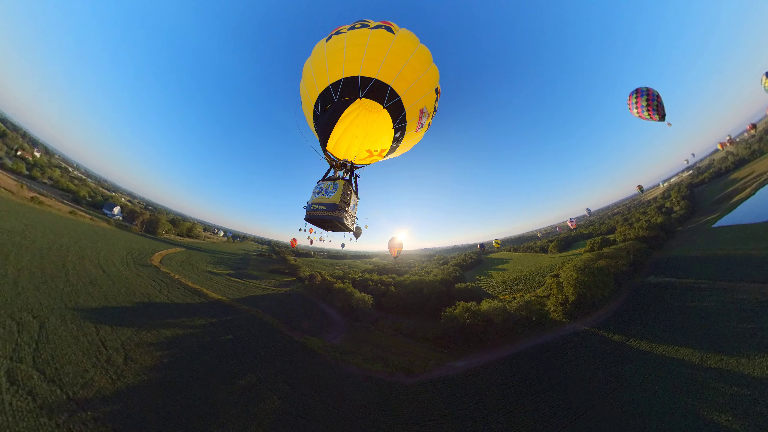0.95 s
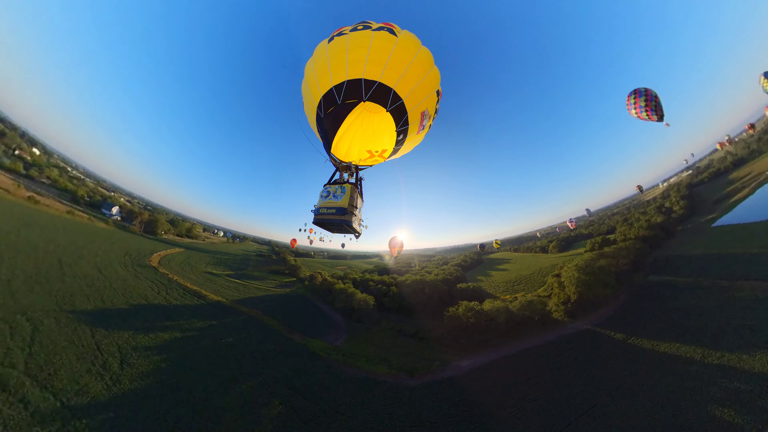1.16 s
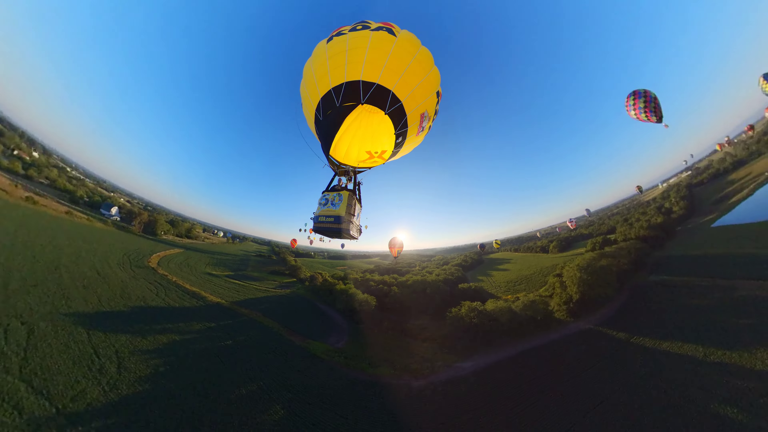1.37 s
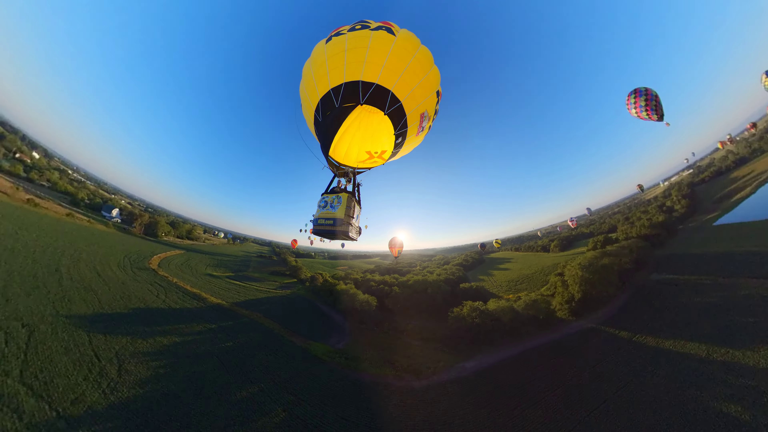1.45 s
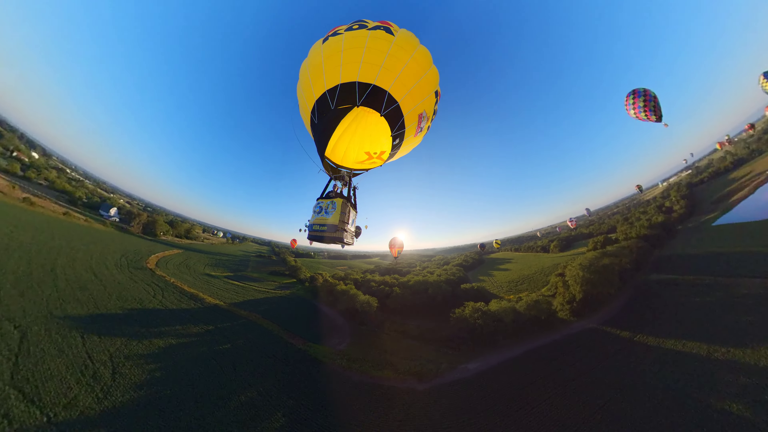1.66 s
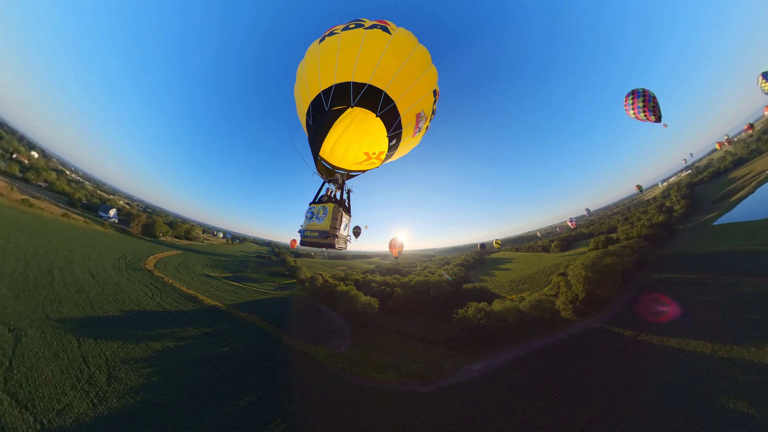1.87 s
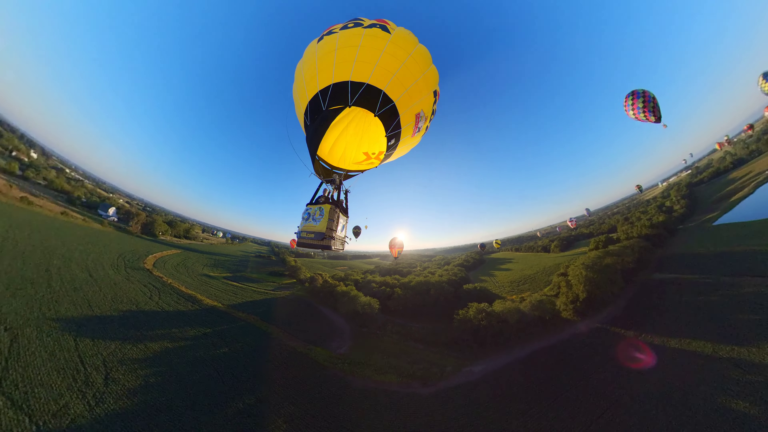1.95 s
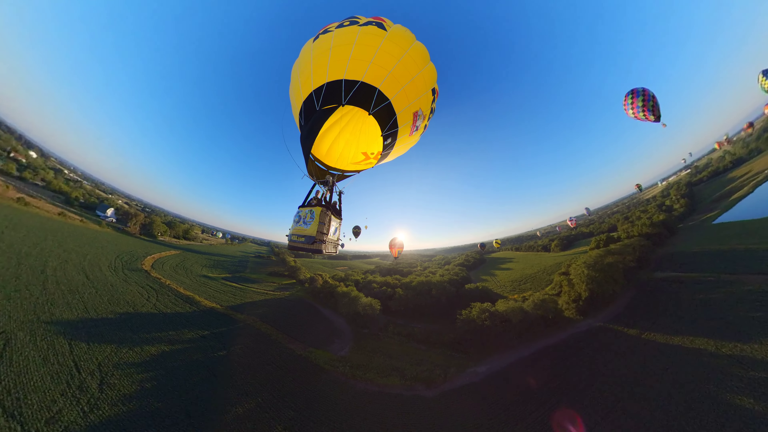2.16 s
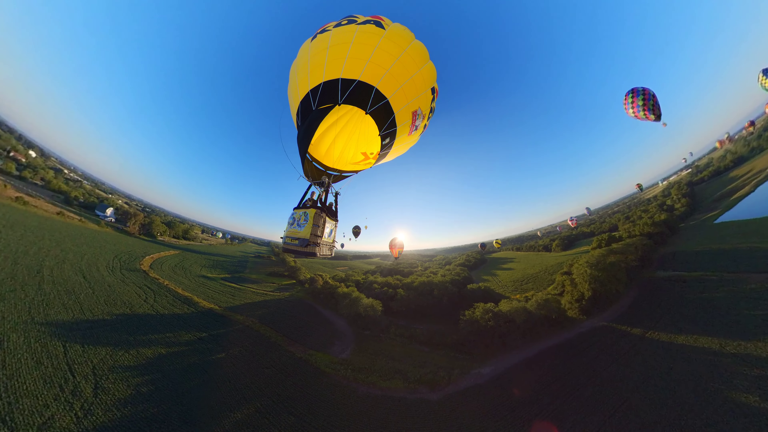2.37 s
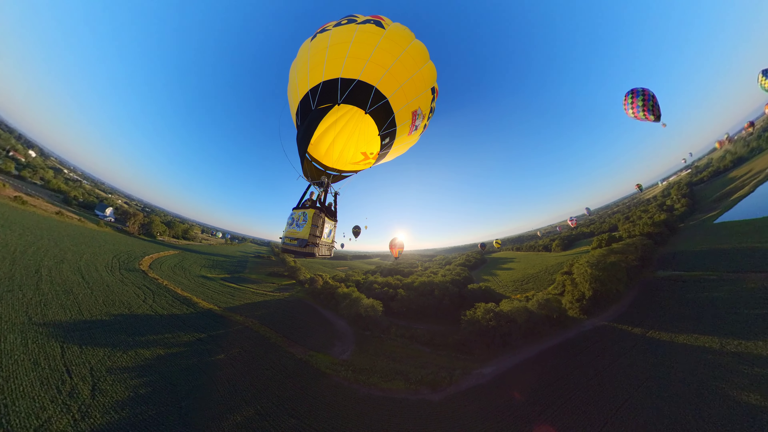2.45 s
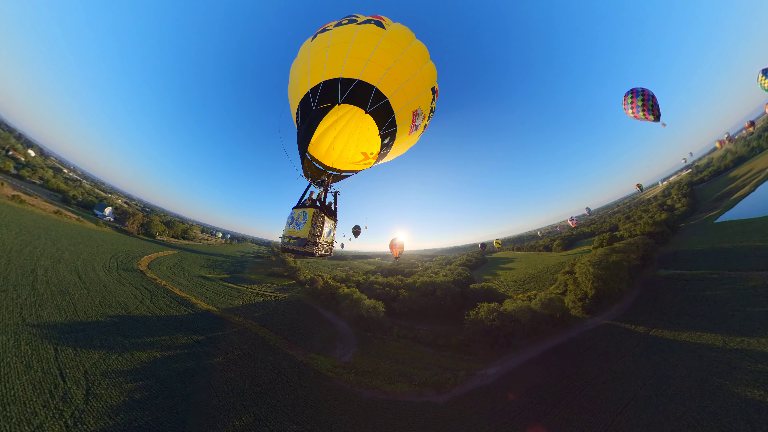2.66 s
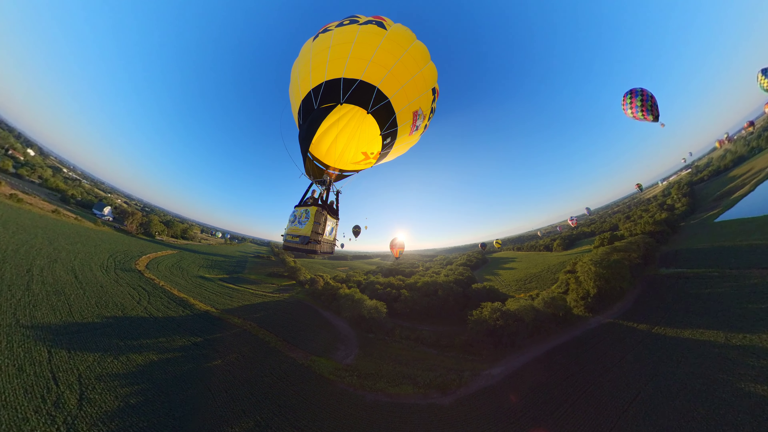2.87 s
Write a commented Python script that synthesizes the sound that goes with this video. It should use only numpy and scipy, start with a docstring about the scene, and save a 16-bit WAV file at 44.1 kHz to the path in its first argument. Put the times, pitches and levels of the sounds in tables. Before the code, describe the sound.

A hot-air balloon gas burner lights with a low whump and roars steadily outdoors

```python
"""A gas burner under a balloon in open air, with a small pilot flame rumbling throughout.
Far birds whistle faintly as a low buffet dies away; the valve clicks with short spits of gas, and the gas
lights with a low whump of sagging pressure swings. The flame, noise with uneven low puffs, then roars and
booms over the patchy hiss of the jets until the valve shuts. Wavering bird tones return at the end.
"""
import sys
import numpy as np
from scipy import signal
from scipy.fft import rfft, irfft
from scipy.io import wavfile
from scipy.ndimage import uniform_filter1d

SR = 44100
rng = np.random.default_rng(int(sys.argv[2]) if len(sys.argv) > 2 else 0)


def store_pcm(level_fs):
    """Save levels as 16-bit WAV."""
    pcm = np.round(np.clip(level_fs, -1, 1) * 32767).astype(np.int16)
    wavfile.write(sys.argv[1], SR, np.atleast_2d(pcm).T)


N = 127890  # length in samples

# Far bird whistles, one curve per call: time_s, pitch_hz, level_db (before the throb)
BIRD_CALLS = [
    [(0, 5650, -76), (.04, 5720, -75), (.07, 5830, -73), (.09, 5880, -70), (.115, 5800, -74),
     (.135, 5650, -84)],
    [(.09, 5700, -86), (.115, 5620, -73), (.14, 5560, -69), (.18, 5400, -72), (.215, 5290, -80)],
    [(0, 4500, -79), (.05, 4550, -78), (.085, 4500, -76), (.11, 4400, -84), (.14, 4500, -82)],
    [(.07, 3800, -88), (.1, 3850, -79), (.14, 3850, -83), (.185, 3900, -76), (.215, 3880, -78)],
    [(.06, 3600, -86), (.08, 3450, -77), (.115, 3300, -79), (.13, 3280, -90)],
    [(.12, 3700, -86), (.145, 3520, -76), (.185, 3430, -75), (.215, 3400, -80)],
    [(2.76, 4500, -80), (2.79, 4550, -72), (2.82, 4350, -71), (2.85, 4250, -82)],
    [(2.77, 6050, -84), (2.795, 6150, -74), (2.83, 6050, -82)],
]
# Spectrum of the far-off air hiss: frequency_hz, relative_level_db_per_hz
AIR_COLOUR = [(1800, -20), (2400, -4), (3000, -10), (3800, -8), (4800, -4), (6000, -2), (6800, -9),
              (8000, -28)]
# Spectrum of the pilot flame: frequency_hz, relative_level_db_per_hz
PILOT_COLOUR = [(15, -38.5), (25, -7), (85, -1.5), (229, -7.5), (257, -9.5), (351, -9.5), (605, -22.5),
                (735, -19.5), (826, -27), (2600, -44.5), (3380, -74), (5720, -120)]
# Steady background over time: time_s, pilot_level_db, air_level_db (of its centre noise)
BACKGROUND_LEVELS = [(0, -44, -81), (.1, -39, -72), (.2, -38, -71.5), (2.76, -36.5, -70.5),
                     (2.83, -39, -65.5), (2.9, -37, -64.5)]
# Gas spits while lighting: start_s, level_db (before the envelope), decay_s
GAS_SPITS = [(.214, -53, .014), (.2245, -36, .003), (.2295, -38, .005), (.2365, -39, .007)]
# Spectrum of the gas spits: frequency_hz, relative_level_db_per_hz
SPIT_COLOUR = [(200, -8), (400, 3), (1000, -8), (2000, -20), (4000, -24), (6500, -25), (8000, -40),
               (9000, -53)]
# Lighting puffs: start_s, level_db (before the envelope), starting_pitch_hz
LIGHTING_PUFFS = [(.2175, -25, 140), (.229, -16, 225), (.238, -6.5, 162)]
# Spectrum of the nozzle hiss: frequency_hz, relative_level_db_per_hz
JET_COLOUR = [(1200, -4), (2000, -6), (2800, -4), (3500, -7), (5000, -3), (6500, -0.5), (7500, -5),
              (8300, -14.5), (9000, -21.5), (9600, -26)]
# Nozzle hiss over time: time_s, lower_hiss_level_db, upper_hiss_level_db
JET_LEVELS = [(0.27, -58, -63.5), (0.32, -53.5, -56), (0.51, -49, -52.5), (1.02, -52, -53),
              (1.32, -54, -50.5), (1.85, -54, -50), (1.98, -52, -53), (2.0, -55, -53), (2.54, -48.5, -53),
              (2.68, -55, -58.5), (2.78, -68.5, -79), (2.8, -70, -66)]
# Low tones when the roar booms: centre_s, pitch_hz, level_db, half_length_s
ROAR_BOOMS = [(1.407, 132, -29.5, .03), (1.864, 148, -30, .03), (1.99, 167, -24, 0.031),
              (2.49, 130, -31, .04), (2.626, 150, -26, 0.048)]
# Spectrum of the main flame: frequency_hz, relative_level_db_per_hz
FLAME_COLOUR = [(15, -49.5), (25, -26.5), (44, 1.5), (86, 5.5), (124, 2.5), (156, 3.5), (262, -1.5),
                (350, -0.5), (636, -11), (900, -19), (2500, -37.5), (3250, -70), (5500, -120)]
# Main flame over time: time_s, rumble_level_db, roar_level_db
FLAME_LEVELS = [(.27, -39, -43), (.29, -42, -37.5), (.35, -35.5, -27.5), (.46, -37.5, -25.5),
                (.65, -33.5, -25.5), (.9, -38, -25), (1.25, -30.5, -25), (1.5, -29, -26.5),
                (1.75, -43, -24.5), (1.98, -33.5, -25), (2.08, -33.5, -27.5), (2.3, -35, -26.5),
                (2.55, -33, -26), (2.69, -36.5, -27), (2.73, -41, -32.5), (2.77, -37.5, -50),
                (2.8, -49, -59)]

GAS_ON_S, FADE_S = 0.249, 0.018  # the burner is fully open at GAS_ON_S, after a fade in
OPPOSITE_HZ = (3050, 6400)  # band of the added noise that is opposite left and right
JET_OPPOSITE_DB, AIR_OPPOSITE_DB = -4.5, -10.5  # added noise against centre noise, before the band filter
TOP_HZ = 9600
BUFFET_S, BUFFET_DB, BUFFET_HZ = 0.055, -32.5, (35, 180)
PILOT_FLICKER_DB, PILOT_SHARED_DB = 1.2, 1.2  # flicker: bands alone; shared: neighbours together
AIR_FLICKER_DB = 5
SPIT_ATTACK_S = .0007
WHUMP_CYCLES, WHUMP_SAG_S, WHUMP_ATTACK_S = 1.3, .008, .0017  # pitch halves after WHUMP_SAG_S
JET_FLICKER_DB, JET_SHARED_DB, JET_SPLIT_HZ = 2.4, .5, 4200
FLAME_FLICKER_DB, FLAME_SHARED_DB, RUMBLE_TOP_HZ = 0.77, 0, 110
PUFFS_PER_S, PUFF_SPREAD_DB, PUFF_TOP_HZ = 200, 3, 288
PUFF_SHARE = 0.12  # share of the low noise power given to puffs


def undb(db):
    """Turn decibels into amplitude."""
    return 10 ** (np.asarray(db) / 20)


def unit(x):
    """Scale a sound to an RMS of 1."""
    return x / np.sqrt(np.mean(x ** 2))


def curve(table, col):
    """Draw one table column as a line over time."""
    rows = np.array(table, float)
    return np.interp(np.arange(N) / SR, rows[:, 0], rows[:, col])


def walk(rate):
    """Wander through random levels held 1 / rate s and slewed twice; spread near 1."""
    hold = int(SR / rate)
    steps = np.repeat(rng.standard_normal(N // hold + 1), hold)
    slewed = uniform_filter1d(uniform_filter1d(steps, hold), hold)
    return 1.07 * slewed[:N]


def lowpass(x, order, top_hz):
    """Keep the lows without shifting them in time."""
    return signal.sosfiltfilt(signal.butter(order, top_hz, fs=SR, output="sos"), x)


def turbulent(x, colour, flicker_db, shared_db, count=3):
    """Colour x, in count bands an octave whose levels wander together and alone."""
    octave = np.log2(np.maximum(np.fft.rfftfreq(N, 1 / SR), 1))
    rows = np.array(colour, float)
    knots = np.log2(rows[:, 0])
    spectrum = rfft(x) * undb(np.interp(octave, knots, rows[:, 1], left=-99, right=-99))
    out, shared = 0, walk(8.5)
    for centre in np.arange(knots[0], min(knots[-1], 14), 1 / count):
        overlap = np.clip(1 - count * abs(octave - centre), 0, 1)
        band = irfft(spectrum * overlap, N)
        # the shared drift changes gradually from band to band
        shared = .8 * shared + .6 * walk(10)
        out = out + band * undb(shared_db * shared + flicker_db * walk(20))
    return unit(out)


def hiss(colour, flicker_db, shared_db, opposite_db):
    """Patchy treble noise, plus a band of added noise that is opposite left and right."""
    centre = turbulent(rng.standard_normal(N), colour, flicker_db, shared_db, count=6)
    added = turbulent(rng.standard_normal(N), colour, flicker_db, shared_db, count=6)
    added = signal.sosfiltfilt(signal.butter(10, OPPOSITE_HZ, "band", fs=SR, output="sos"), added)
    return centre + undb(opposite_db) * added * np.array([[1], [-1]])


def gate(table, col):
    """Level of a burner layer, silent while the valve is shut."""
    t = np.arange(N) / SR
    opening = np.clip((t - GAS_ON_S) / FADE_S + 1, 0, 1)
    closing = np.clip((table[-1][0] - t) / FADE_S, 0, 1)
    return opening * closing * undb(curve(table, col))


def air():
    """Wispy hiss of far-off air, its bands wavering apart."""
    return undb(curve(BACKGROUND_LEVELS, 2)) * hiss(AIR_COLOUR, AIR_FLICKER_DB, 0, AIR_OPPOSITE_DB)


def whistles():
    """Faint bird tones following drawn pitch curves, wavering and slightly rough."""
    out, t = 0, np.arange(N) / SR
    for call in BIRD_CALLS:
        hz = curve(call, 1) * (1 + .008 * walk(200))
        throb = .7 + .5 * walk(200)
        on = (t >= call[0][0]) & (t < call[-1][0])
        tone = np.sqrt(2) * np.sin(2 * np.pi * np.cumsum(hz) / SR)
        out = out + on * undb(curve(call, 2)) * throb * tone
    return out


def buffet():
    """A low noise buffet dying away at the start."""
    bandpass = signal.butter(2, BUFFET_HZ, "band", fs=SR, output="sos")
    low = unit(signal.sosfilt(bandpass, rng.standard_normal(N)))
    return undb(BUFFET_DB) * low * np.exp(-(np.arange(N) / SR / BUFFET_S) ** 2)


def pilot():
    """The small flame rumbles as low turbulent noise."""
    fire = turbulent(rng.standard_normal(N), PILOT_COLOUR, PILOT_FLICKER_DB, PILOT_SHARED_DB)
    return undb(curve(BACKGROUND_LEVELS, 1)) * fire


def spits():
    """Short bursts of gas noise as the valve opens and the flame catches."""
    env = 0
    for start, db, decay in GAS_SPITS:
        u = np.maximum(np.arange(N) / SR - start, 0)
        env = env + undb(db) * (1 - np.exp(-u / SPIT_ATTACK_S)) * np.exp(-u / decay)
    return env * turbulent(rng.standard_normal(N), SPIT_COLOUR, 0, 0)


def whump():
    """Each lighting puff is a short pressure swing, suction first, whose pitch sags."""
    out, t = 0, np.arange(N) / SR
    for start, db, hz in LIGHTING_PUFFS:
        u = np.maximum(t - start, 0)
        turns = hz * WHUMP_SAG_S * np.log1p(u / WHUMP_SAG_S)
        attack = 1 - np.exp(-u / WHUMP_ATTACK_S)
        decay = np.exp(-(turns / WHUMP_CYCLES) ** 4)
        out = out - undb(db) * attack * decay * np.sin(2 * np.pi * turns)
    return out


def jets():
    """Hiss of the nozzles; its lower and upper parts swell apart."""
    both = hiss(JET_COLOUR, JET_FLICKER_DB, JET_SHARED_DB, JET_OPPOSITE_DB)
    lower = lowpass(both, 3, JET_SPLIT_HZ)
    upper = both - lower
    return gate(JET_LEVELS, 1) * unit(lower) + gate(JET_LEVELS, 2) * unit(upper)


def booms():
    """Brief low tones of unsteady pitch inside the roar."""
    out, t = 0, np.arange(N) / SR
    for centre, hz, db, half in ROAR_BOOMS:
        turns = np.cumsum(hz * (1 + .06 * walk(40))) / SR
        swell = np.exp(-((t - centre) / half) ** 2)
        out = out + np.sqrt(2) * undb(db) * swell * np.sin(2 * np.pi * turns)
    return out


def flame():
    """Pockets of gas burn as soft low puffs within an even rush."""
    hit = rng.random(N) < PUFFS_PER_S / SR
    strength = undb(PUFF_SPREAD_DB * rng.standard_normal(N)) * rng.choice([-1., 1.], N)
    puffs = hit * strength * np.sqrt(SR / PUFFS_PER_S)
    rush = rng.standard_normal(N)
    # in the lows, puffs take over part of the rush
    swap = np.sqrt(PUFF_SHARE) * puffs + (np.sqrt(1 - PUFF_SHARE) - 1) * rush
    source = rush + lowpass(swap, 2, PUFF_TOP_HZ)
    fire = turbulent(source, FLAME_COLOUR, FLAME_FLICKER_DB, FLAME_SHARED_DB)
    rumble = lowpass(fire, 2, RUMBLE_TOP_HZ)
    roar = fire - rumble
    return unit(rumble) * gate(FLAME_LEVELS, 1) + unit(roar) * gate(FLAME_LEVELS, 2)


def scene():
    """Sum all layers from the background to the flame, in two channels."""
    background = air() + whistles() + buffet() + pilot()
    lighting = spits() + whump()
    burner = jets() + booms() + flame()
    return background + lighting + burner


def record(dry):
    """Cut the treble steeply above TOP_HZ."""
    return signal.sosfilt(signal.ellip(8, .2, 70, TOP_HZ, fs=SR, output="sos"), dry)


dry = scene()
out = record(dry)
store_pcm(out)
```